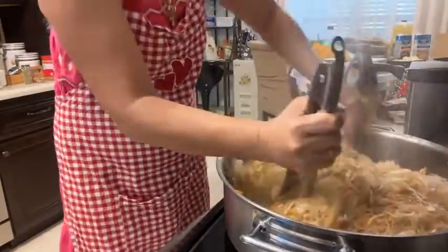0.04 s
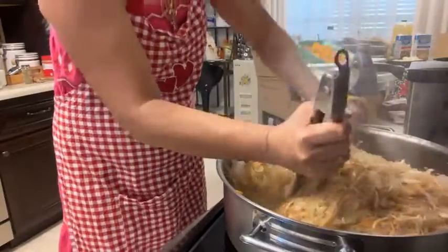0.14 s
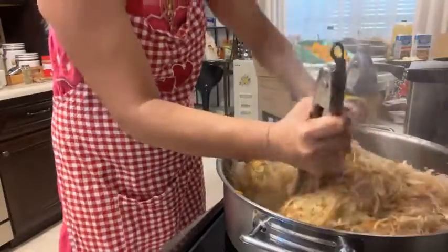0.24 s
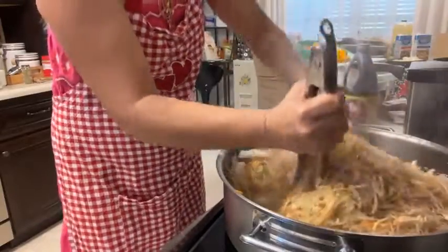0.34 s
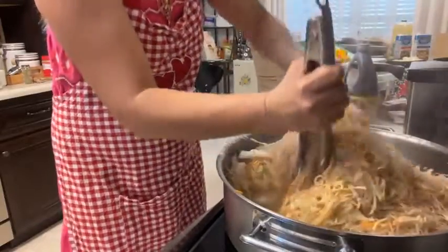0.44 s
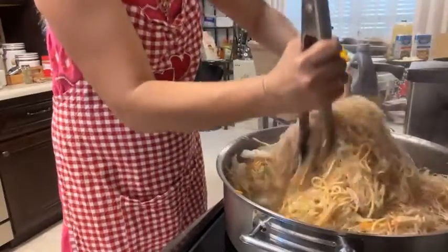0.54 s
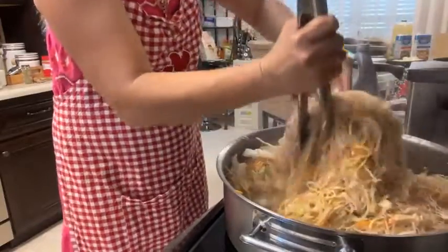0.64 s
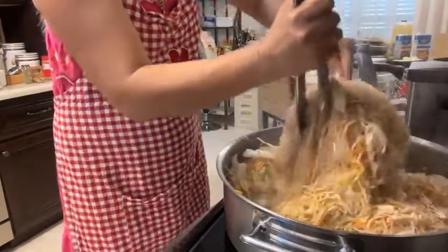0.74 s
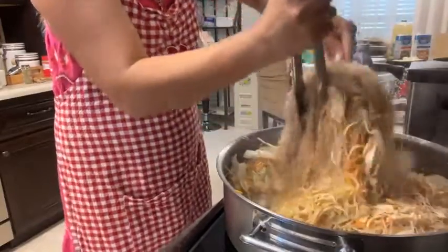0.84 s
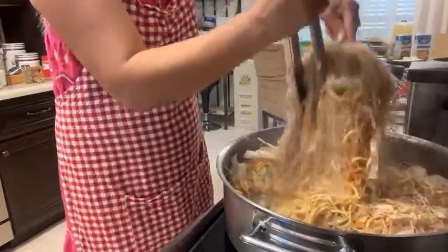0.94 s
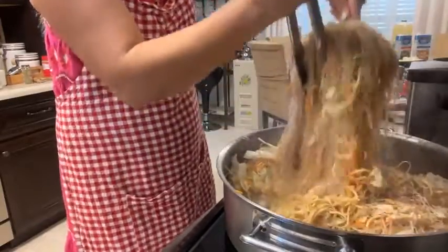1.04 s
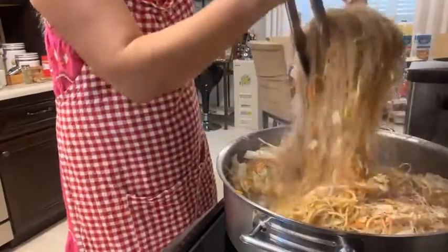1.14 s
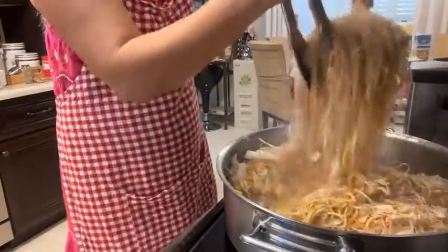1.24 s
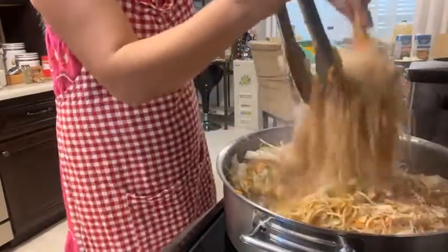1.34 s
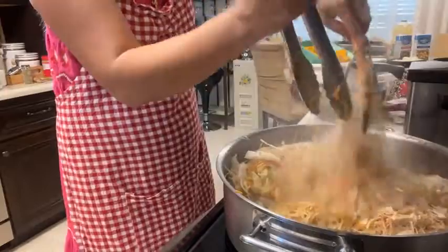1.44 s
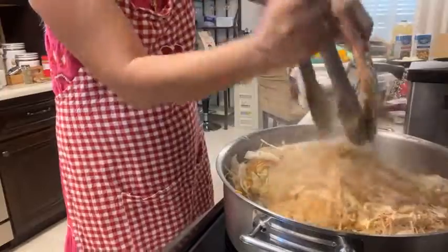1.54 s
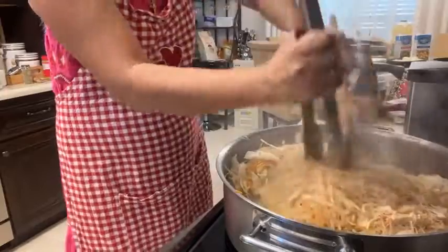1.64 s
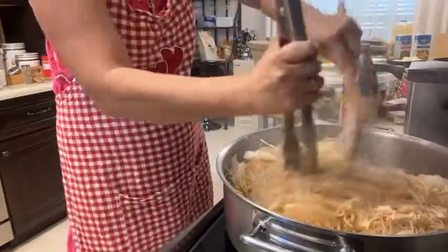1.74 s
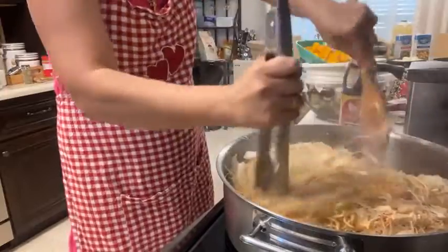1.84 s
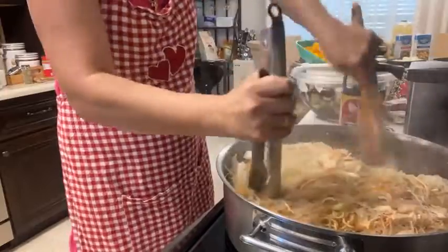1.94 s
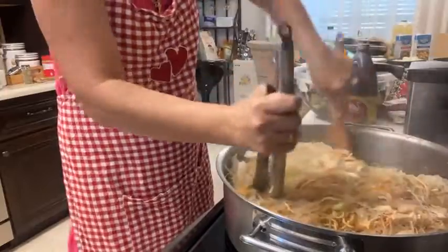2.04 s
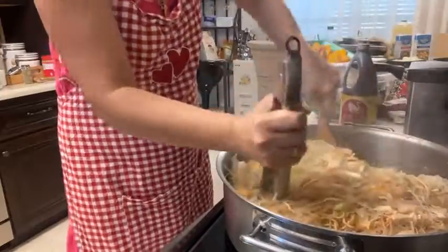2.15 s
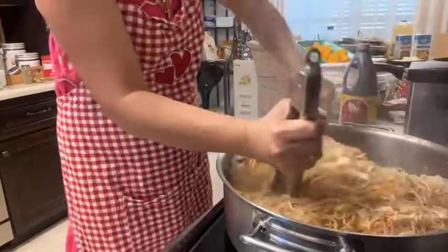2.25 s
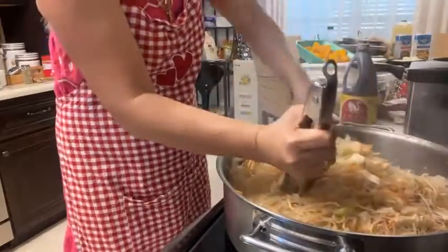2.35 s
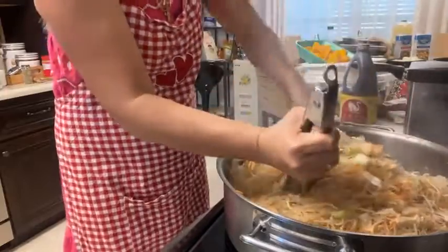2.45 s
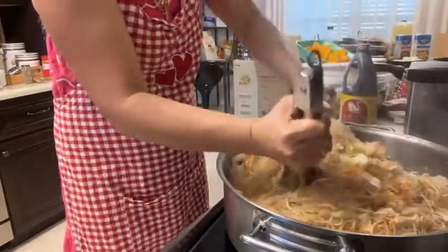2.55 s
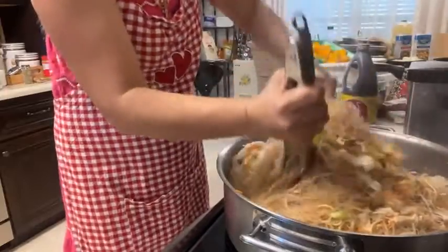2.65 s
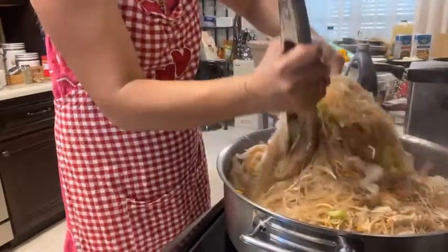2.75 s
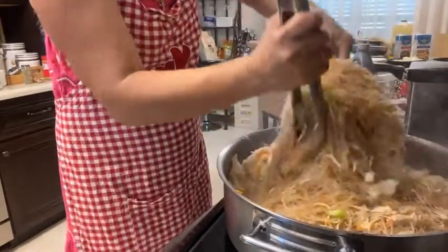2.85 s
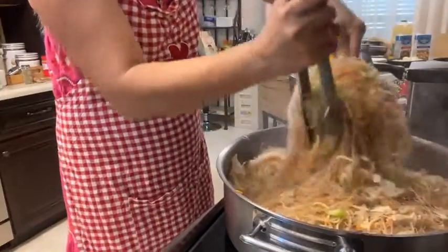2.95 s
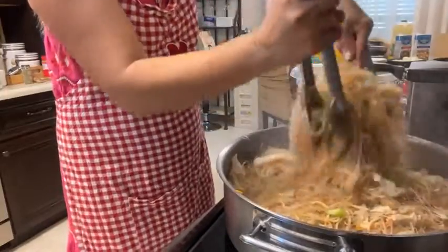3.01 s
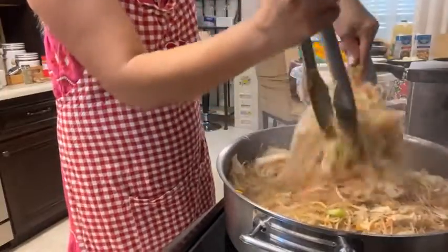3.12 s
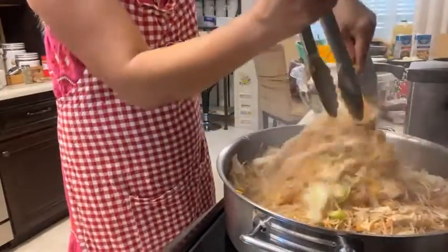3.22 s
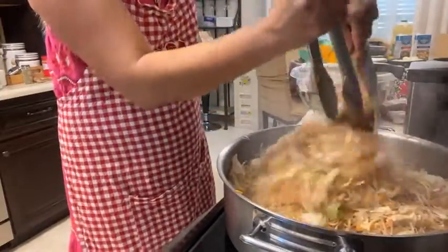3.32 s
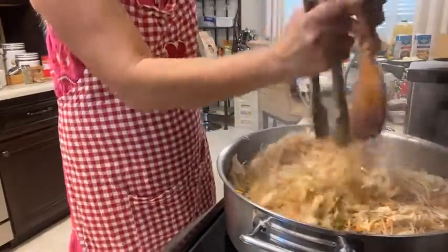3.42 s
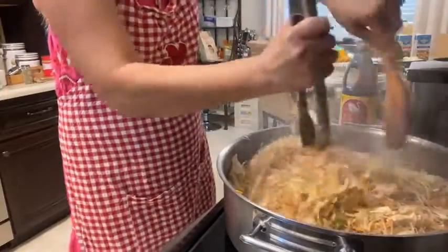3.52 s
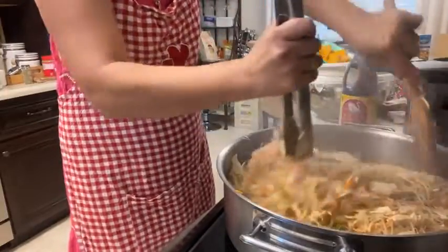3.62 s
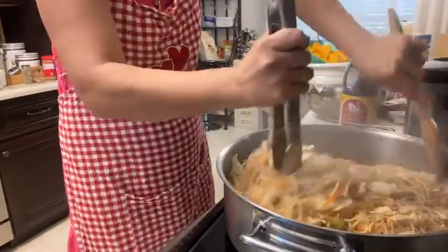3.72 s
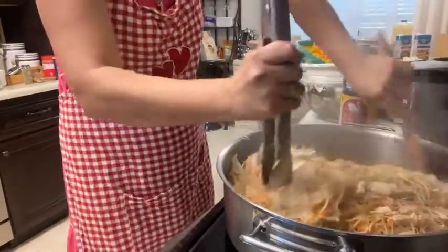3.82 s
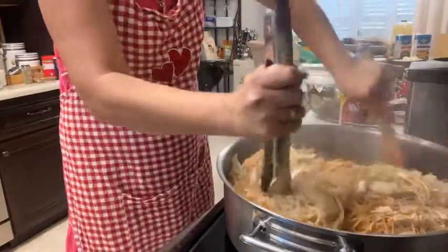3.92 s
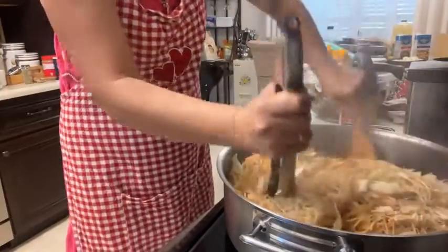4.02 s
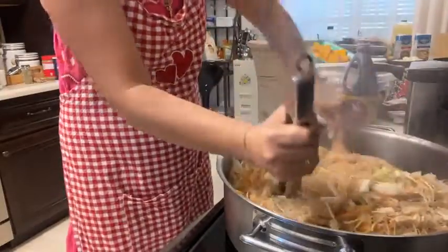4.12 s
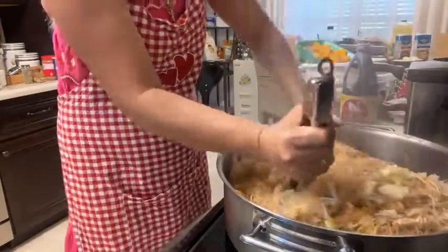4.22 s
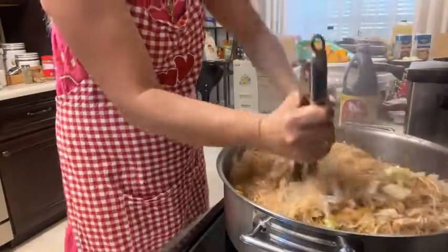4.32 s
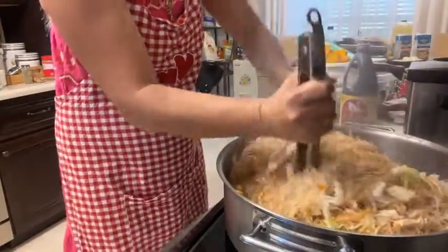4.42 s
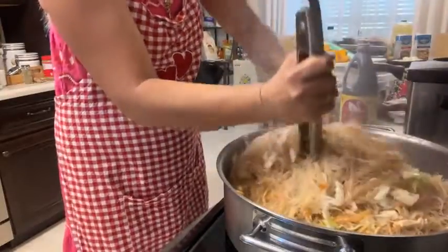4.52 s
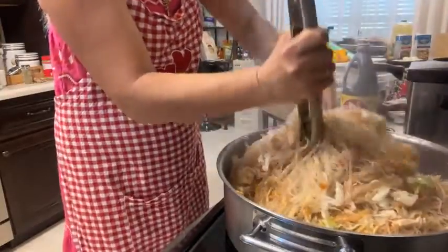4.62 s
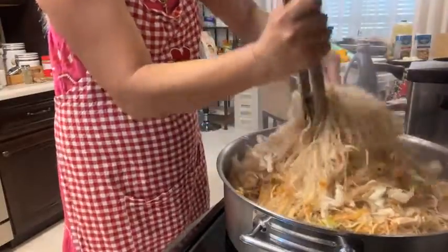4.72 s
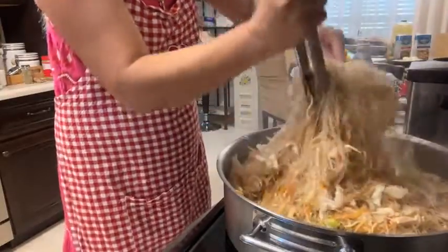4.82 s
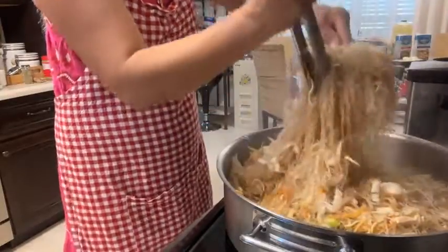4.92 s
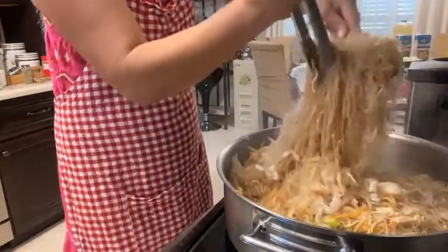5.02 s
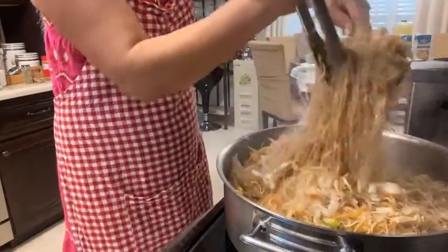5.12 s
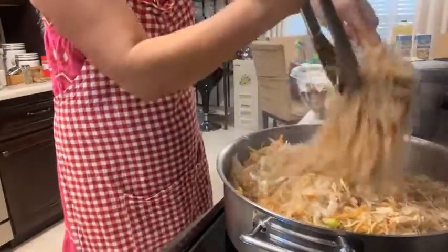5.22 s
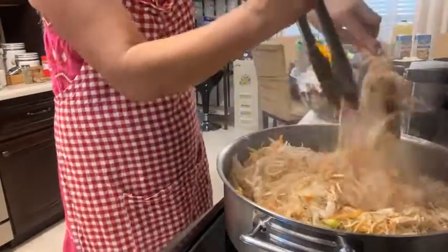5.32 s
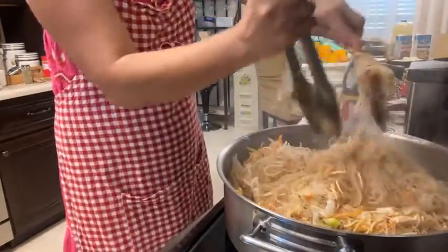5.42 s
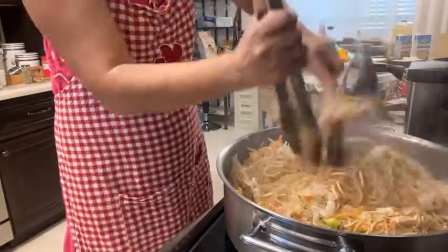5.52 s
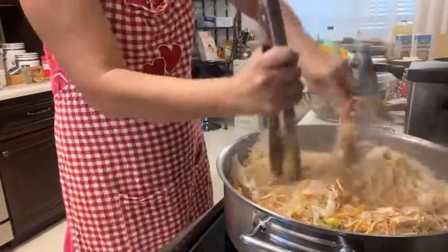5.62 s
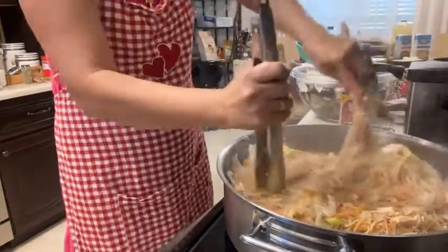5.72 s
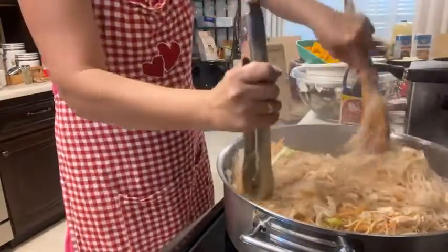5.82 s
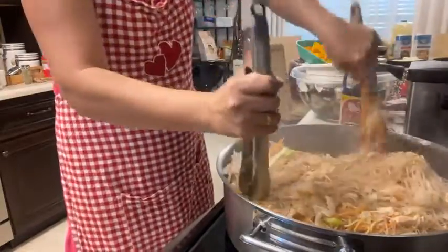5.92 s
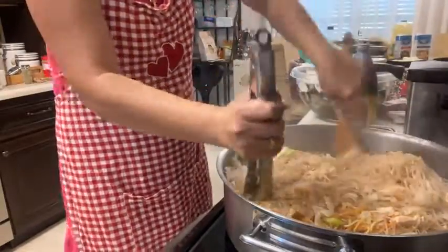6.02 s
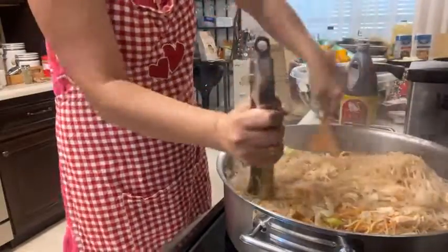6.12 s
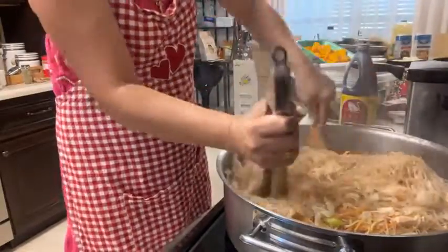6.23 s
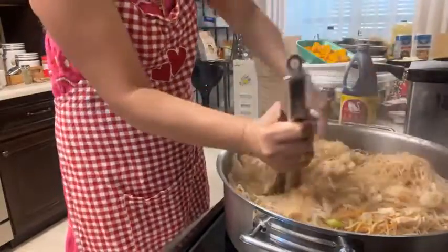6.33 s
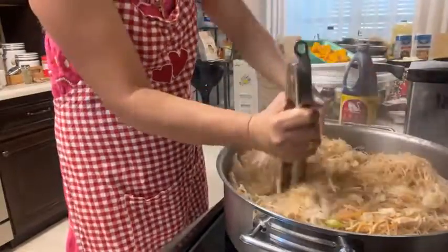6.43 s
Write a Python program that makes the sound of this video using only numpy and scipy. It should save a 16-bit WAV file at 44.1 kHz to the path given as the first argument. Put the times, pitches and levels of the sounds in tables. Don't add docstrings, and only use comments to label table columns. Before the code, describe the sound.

Close by in a small hard kitchen, a large loaded steel pot is struck at the start, hardest at about two seconds, softly at four and firmly again near six. Each strong pair is a dull wooden knock followed by a bright metal clank with a low stove thud. Noodles slump wetly, tongs scrape and clink. Soft sizzle and a slowly beating motor hum continue underneath, caught by a small microphone.

```python
import sys
import numpy as np
from scipy import signal
from scipy.fft import rfft, irfft, next_fast_len
from scipy.io import wavfile
from scipy.ndimage import uniform_filter1d

SR = 44100
rng = np.random.default_rng(int(sys.argv[2]) if len(sys.argv) > 2 else 0)


def magnitude_from_level(level_db):
    exponent = np.asarray(level_db, float) / 20
    return 10 ** exponent


def unload_wav(signal):
    wavfile.write(
        sys.argv[1],
        SR,
        np.round(np.clip(np.atleast_2d(signal).T, -1, 1) * 32767).astype(np.int16),
    )


N = 284886


def evened(x):
    return x / np.sqrt(np.mean(x ** 2) + 1e-20)


def read(points, hz):
    f, value = np.transpose(points)
    return np.interp(np.log(hz + 1), np.log(f + 1), value)


def add(mix, s, sound):
    at = round(s * SR)
    part = mix[max(at, 0):][:len(sound) + min(at, 0)]
    part += sound[max(-at, 0):][:len(part)]


def coloured(count, db_of_hz):
    size = next_fast_len(count)
    spectrum = rfft(rng.standard_normal(size))
    gain = magnitude_from_level(db_of_hz(np.fft.rfftfreq(size, 1 / SR)))
    return evened(irfft(spectrum * gain, size)[:count])


def band_db(f, hz, width):
    return -10 * np.log10(1 + ((f - hz) / width) ** 4)


def ring(t, hz, t60, rise_ms, spread):
    rise = rise_ms / 1000
    offset = np.linspace(-1, 1, 3)[:, None] * rng.uniform(0.39, 1.67, (3, 1))
    turns = hz * (1 + spread * offset) * (t - 1.489 * rise) + rng.random()
    cluster = magnitude_from_level(-8.0 * abs(np.sign(offset))) * np.sin(2 * np.pi * turns)
    swell = (1 - np.exp(-t / rise)) ** 3
    return swell * magnitude_from_level(-60 * t / t60) * cluster.sum(0)


def blow(count, row, modes, crack_colour, crack_t60):
    s, crack_db, rattle_db, pitch, damping = row
    t = np.arange(SR // 2) / SR
    noise = coloured(len(t), lambda hz: read(crack_colour, hz)) * (1 - np.exp(-t / 0.00036))
    snap = magnitude_from_level(-1.5 - 60 * t / 0.0034)
    rattle = magnitude_from_level(rattle_db - 60 * t * damping / 0.19)
    crack = magnitude_from_level(crack_db) * noise * (snap + magnitude_from_level(-60 * t / crack_t60) + rattle)
    rings = 0
    for hz, t60, rise_ms, *db in modes:
        rings = rings + magnitude_from_level(db[count]) * ring(t, hz * pitch, t60 / damping, rise_ms, 0.027)
    tremor = evened(uniform_filter1d(uniform_filter1d(rng.standard_normal(len(t)), 250), 250))
    tremor_db = 2 * tremor * np.minimum(t / 0.021, 1)
    return s, crack + rings * magnitude_from_level(tremor_db)


def spatula_blows():
    # t/s, crack/dB, rattle/dB, pitch factor, damping by the food (factor)
    blows = [
        (2.0166, -13.5, -22, 1.0, 1),
        (6.0362, -26, -12, 1.005, 1.1),
        (3.8300, -64, -14, .99, 1.37),
    ]
    # f/Hz, t60/s, rise/ms, then level/dB for each blow, as each lands on another spot
    modes = [(210, 0.2, 8.7, -28, -36, -49.5), (429.5, 0.053, 9.25, 3, -2, -25),
             (644, 0.19, 7.23, -27, -28.5, -58), (851, 0.11, 4.55, -21.5, -27.5, -60),
             (1019, 0.061, 6.5, -3.5, -12, -52), (1052, 0.18, 8, -16, -25.5, -70),
             (1190, 0.1, 1.36, -17.5, -43, -70), (1345, 0.07, 0.99, -20.5, -38, -70),
             (1650, 0.042, 1.77, -16, -38, -72), (1924, 0.039, 1.227, -19, -25, -70),
             (2557, 0.083, 4, -18.5, -29, -75), (2796, 0.052, 1.01, -19, -29, -75),
             (3330, 0.052, 1.2, -27, -30, -75), (3630, 0.04, 1.28, -23, -36, -75),
             (4080, 0.055, 1.03, -22.5, -46, -77), (4480, 0.031, 1.25, -28, -45, -75),
             (4700, 0.044, 2.6, -18, -42, -75)]
    # f/Hz, level/dB per Hz
    crack = [(180, -34), (300, -11), (1150, 0.5), (2170, -8), (2790, -8.5), (4910, -11.5), (5700, -25),
             (14000, -46), (16000, -55)]
    return [blow(k, row, modes, crack, 0.041) for k, row in enumerate(blows)]


def tong_blows():
    # t/s, crack/dB, rattle/dB, pitch factor, damping by the food (factor)
    blows = [
        (-0.012, -14.5, -11.5, 0.99, 1.22),
        (2.1252, -8, -16, 0.99, 1.08),
        (4.2000, -23.5, -11.5, 1.01, 1.22),
        (6.1079, -12.5, -17, 1.006, 1.22),
    ]
    # f/Hz, t60/s, rise/ms, then level/dB for each blow, as each lands on another spot
    modes = [(419, 0.09, 4.3, -17.5, -15, -30.5, -28), (649.5, 0.11, 4.77, -23, -20.5, -47, -30),
             (760, 0.078, 6.6, -23, -15, -37, -24), (927, 0.16, 6.9, -28.5, -20, -37, -33),
             (1250, 0.036, 1.15, -13, -10.5, -28, -19.5), (1507, 0.053, 1.81, -32, -18, -37.5, -28),
             (2170, 0.06, 0.84, -29, -25, -27, -21.5), (2390, .05, 1.26, -28, -29, -34, -20),
             (2700, 0.026, 0.75, -26, -15.5, -33, -16), (3050, 0.028, 0.662, -28, -25, -46, -17.5),
             (3770, 0.025, 0.883, -26, -26, -32, -35), (4300, 0.021, 0.665, -14, -26, -23, -27),
             (4770, 0.043, 0.763, -20, -35, -32, -21), (5370, 0.032, 0.82, -30, -18, -38, -28),
             (6560, 0.031, 0.797, -30, -26, -40, -17), (7450, 0.019, 0.64, -32, -37, -44, -26),
             (8500, 0.024, .8, -32, -33, -37, -25)]
    # f/Hz, level/dB per Hz
    crack = [(180, -43), (330, 0.5), (1210, -5), (5340, -12), (6000, -12.5), (6620, -6.5), (8090, -20.5),
             (13500, -17.5), (16000, -29)]
    return [blow(k, row, modes, crack, 0.0091) for k, row in enumerate(blows)]


def thud(s, db, hz):
    t = np.arange(SR // 2) / SR
    t60, rise_ms = 0.072, 7.7
    knock = ring(t, hz, t60, rise_ms, 0.15)
    grate = magnitude_from_level(-24.5) * ring(t, hz, 0.29, 2 * rise_ms, 0.119)
    stove = magnitude_from_level(-8) * ring(t, 107, 1.2 * t60, 1.15 * rise_ms, .1)
    shove = magnitude_from_level(-24) * ring(t, 61, 0.19, 9, .4)
    return s, magnitude_from_level(db) * (knock + grate + stove + shove)


def stove_thuds():
    # t/s, level/dB, f/Hz
    jolts = [(0.004, -16, 124), (0.012, -21, 190), (2.024, -20.5, 168), (2.128, -9.5, 125),
             (2.155, -16, 171.7), (3.364, -44, 220), (3.832, -42, 210), (3.974, -28.5, 153),
             (3.994, -27.5, 112), (4.203, -24.5, 167.4), (6.046, -23.5, 168), (6.079, -9.5, 160),
             (6.112, -13, 126), (6.14, -17, 152), (6.44, -46, 110)]
    return [thud(*row) for row in jolts]


def clink(s, ring_db, hz, t60, tick_db):
    t = np.arange(SR // 5) / SR
    tick_hz = np.sqrt(hz * 4500)
    blur = .032 * (1 + (hz / 11000) ** 4)

    def tick_colour(f):
        touch_db = -5.0 * np.log2((f + 1) / tick_hz) ** 2
        hinge_db = -4.0 * np.log2(13500 / tick_hz) ** 2 - 60 * np.log2((f + 1) / 13500) ** 2
        return np.maximum(touch_db, hinge_db)

    tick = coloured(len(t), tick_colour) * (1 - np.exp(-t / 0.00073)) * magnitude_from_level(-60 * t / 0.039)
    chatter = coloured(len(t), lambda f: band_db(f, hz, blur * hz))
    chatter = chatter * (1 - np.exp(-t / 0.00063)) * magnitude_from_level(-60 * t / t60)
    tone = magnitude_from_level(-2.5 - 14 * (hz / 13000) ** 2) * ring(t, hz, 0.65 * t60, 0.597, blur)
    return s, magnitude_from_level(ring_db) * (tone + magnitude_from_level(-5.5) * chatter) + magnitude_from_level(tick_db) * tick


def tong_clinks():
    # t/s, ring/dB, f/Hz, t60/s, tick/dB
    touches = [(0.2089, -31, 7270, .04, -41), (0.2095, -43, 8100, .03, -43), (1.5972, -36, 933, 0.038, -43),
               (1.602, -40, 497, 0.036, -41), (1.609, -44, 7350, .045, -39),
               (1.6245, -33.5, 2890, 0.033, -42), (2.1267, -33, 13500, .22, -26),
               (2.236, -45, 5000, .08, -44), (3.3643, -30, 1050, 0.031, -40),
               (3.3647, -25.5, 486, .04, -35), (3.366, -44, 6420, .16, -45), (3.387, -40, 6300, .04, -41),
               (3.394, -33, 600, .024, -40), (3.403, -41, 14000, 0.27, -48), (3.416, -35, 2700, 0.08, -36),
               (3.4173, -37, 4940, .05, -50), (3.417, -39, 3170, 0.079, -48), (3.440, -44, 2930, .1, -36),
               (3.5638, -44.5, 7370, .1, -47), (3.905, -46, 5700, .06, -51), (4.02, -46, 5250, .08, -43),
               (4.229, -34, 900, 0.018, -46), (4.4194, -49, 4000, .02, -48.5), (6.44, -44, 1100, .05, -46)]
    return [clink(*row) for row in touches]


def slide(s, level_db, tilt_db, fill_db):
    # f/Hz, width/Hz, level/dB
    resonances = [(485, 54, -6), (796, 28, -19), (1270, 170, 4), (1490, 31, 5.5), (2166, 150, 1.5),
                  (2820, 95, 3), (4260, 240, 2.5), (4780, 220, -4.5), (6540, 160, 2), (7350, 190, -37),
                  (13300, 1600, -6)]
    # f/Hz, level/dB per Hz
    food_colour = [(88, -10), (150, 2), (321, -13), (745, -1), (1760, -13.5), (2870, -8), (10000, -21.5),
                   (13700, -27), (16000, -33)]
    size = 2 ** 15
    t, hz = s[0] + np.arange(size) / SR, np.fft.rfftfreq(size, 1 / SR)
    slips, wet, grip = rng.standard_normal((3, size))
    quick_grip = evened(uniform_filter1d(grip, 120))
    slow_grip = evened(uniform_filter1d(grip[::-1], 700))
    grip = magnitude_from_level(1.8 * quick_grip + 1.24 * slow_grip)
    body = sum(magnitude_from_level(db) / (1 + 2j * (hz - f) / width) for f, width, db in resonances)
    metal = evened(irfft(rfft(slips * grip) * body / (1 + (hz / 8500) ** 4) ** 0.69))
    food = evened(irfft(rfft(wet * grip) * magnitude_from_level(read(food_colour, hz))))
    fill = magnitude_from_level(fill_db)
    sound = (metal + fill * food) / np.sqrt(1 + fill ** 2)
    low = irfft(rfft(sound) / (1 + (hz / 2000) ** 4))
    sound = low + (sound - low) * magnitude_from_level(1.77 * tilt_db)
    ends = np.clip(np.minimum(t - s[0], s[-1] - t) / .01, 0, 1)
    return s[0], sound * magnitude_from_level(np.interp(t, s, level_db)) * ends


def slump(s, hold, db, fall_db_per_s):
    fade_db = 23
    times = s + np.array([0, hold, hold + fade_db / fall_db_per_s])
    return slide(times, db - np.array([0, 0, fade_db]), tilt_db=-3, fill_db=4.5)


def noodle_slumps():
    # start t/s, hold/s, level/dB, fall/(dB per s)
    falls = [
        (0.0, 0.024, -34.5, 76),
        (2.031, 0.015, -33.5, 155),
        (2.13, 0.037, -33, 120),
        (2.23, 0.062, -43.5, 62),
        (3.366, 0.046, -45.5, 170),
        (4.205, 0.012, -44, 96),
        (6.045, .11, -39, 114),
    ]
    return [slump(*row) for row in falls]


def scrape(s, length, db, tilt_db):
    times = s + np.array([0, 0.36 * length, length, length + 0.023])
    return slide(times, db + np.array([-8, 0, -4, -25]), tilt_db, fill_db=-6.5)


def tong_scrapes():
    # start t/s, length/s, level/dB, brightness/(dB per octave)
    drags = [
        (.11, 0.12, -39.5, -1.5),
        (4.229, 0.062, -41, -7),
        (6.222, 0.12, -40, 2),
    ]
    return [scrape(*row) for row in drags]


def room(x):
    # f/Hz, t60/s
    decay = [(100, 0.64), (400, 0.76), (1000, 0.43), (3000, 0.33), (8000, 0.38), (15000, 0.2)]
    # f/Hz, level/dB
    send = [(100, 0), (450, -7), (1000, -0.5), (4000, -4.5), (12000, 0)]
    taps = np.zeros(SR)
    at = np.arange(200, SR - 20, 20)
    taps[at + rng.integers(0, 20, len(at))] = rng.choice([-1., 1.], len(at))
    hz, t, z = signal.stft(taps, SR, nperseg=256)
    fade_db = read(send, hz)[:, None] - 60 * t / read(decay, hz)[:, None]
    tail = signal.istft(z * magnitude_from_level(fade_db), SR, nperseg=256)[1]
    return signal.fftconvolve(x, tail / np.linalg.norm(tail))[:N]


def sizzle():
    # t/s, level/dB
    liveliness = [(0.3, 2), (1.0, 2), (1.562, 3.5), (1.95, 2), (2.55, -0.5), (3.3, -.3), (3.6, -0.2),
                  (3.856, 2), (4.07, 7.5), (4.17, -.8), (4.4, -1.5), (4.59, -0.6), (4.948, 1.2), (5.144, 2),
                  (6.0, 1.5), (6.46, 1.9)]
    # f/Hz, level/dB per Hz
    air_colour = [(15, -56), (25, -25), (64, -8), (120, 3), (175, -14), (270, -18.5), (451, -13),
                  (545, -16), (887, -14), (1890, -15), (2760, -19.5), (5730, -17.5), (9840, -29),
                  (14000, -25), (16000, -28)]
    s, lively_db = np.transpose(liveliness)
    frames, hz = N // 256 + 5, np.fft.rfftfreq(1024, 1 / SR)
    t = np.arange(frames) * 256 / SR
    a, b, patches = rng.standard_normal((frames, 513, 3)).T
    patches = evened(uniform_filter1d(uniform_filter1d(patches, 5, 0), 20, 1))
    hiss = np.clip(np.log2((hz + 1) / 1200), 0, 1)[:, None]
    body = 1 - hiss
    stirred = (hz > 220)[:, None]
    drift_db = (hiss + body * 0.64) * np.interp(t, s, lively_db) + body * -1.37
    without_hum = [p for p in air_colour if abs(p[0] - 120) > 20]
    colour_db = read(without_hum, hz)[:, None]
    spectrum = (a + 1j * b) * magnitude_from_level(colour_db + stirred * drift_db + 1.76 * patches)
    air = signal.istft(spectrum, nperseg=1024, noverlap=768)[1][:N]
    air = signal.sosfilt(signal.butter(4, 52, "high", fs=SR, output="sos"), air)
    pop_db = 4.8 * np.minimum(rng.exponential(1, N), 4)
    pops = (rng.random(N) < 300 / SR) * rng.choice([-1, 1], N) * magnitude_from_level(pop_db)
    pops = signal.sosfilt(signal.butter(2, [1500, 9000], "band", fs=SR, output="sos"), pops)
    return magnitude_from_level(-51.5) * evened(air) + magnitude_from_level(-67.0) * evened(pops)


def hum():
    # f/Hz, rms level/dB
    motors = [(119.97, -57), (121.4, -56)]
    # f/Hz, width/Hz, rms level/dB
    rumbling = [(125, 12, -67.5), (483, 14, -71.5), (449, 13, -75.5), (1990, 140, -73)]
    t = np.arange(N) / SR - 3.075
    tones, rumbles = np.zeros(N), np.zeros(N)
    for k, (hz, db) in enumerate(motors):
        tones += (-1) ** k * np.sqrt(2) * magnitude_from_level(db) * np.sin(2 * np.pi * hz * t)
    for hz, width, db in rumbling:
        rumbles += magnitude_from_level(db) * coloured(N, lambda f: band_db(f, hz, width))
    return magnitude_from_level(-2.2) * tones + rumbles


def scene():
    near = np.zeros(N + SR // 10)
    sounds = spatula_blows() + tong_blows() + stove_thuds() + tong_clinks()
    sounds += noodle_slumps() + tong_scrapes()
    for s, sound in sounds:
        add(near, s + 1 / 20, sound)
    wet = near[:N] + magnitude_from_level(-18.5) * room(near)
    pot = np.append(wet[SR // 20:], np.zeros(SR // 20))
    return (pot + sizzle() + hum())[None]


def roll_off(x):
    return signal.sosfilt(signal.butter(12, 16680, fs=SR, output="sos"), x)


def record(dry):
    cut = signal.sosfilt(signal.butter(2, 28, "high", fs=SR, output="sos"), dry)
    cut = cut / (1 + (cut / 0.86) ** 4) ** (1 / 4)
    band_limit = signal.firwin(511, 16150, window=("kaiser", 9), fs=SR)
    cut = signal.oaconvolve(cut, band_limit[None], "same")
    return roll_off(cut)


dry = scene()
out = record(dry)
unload_wav(out)
```